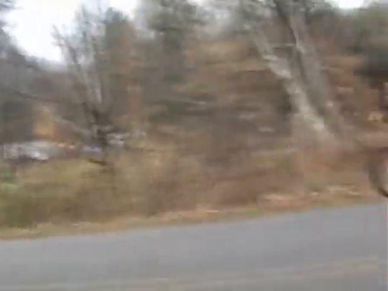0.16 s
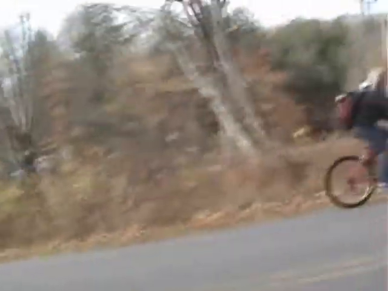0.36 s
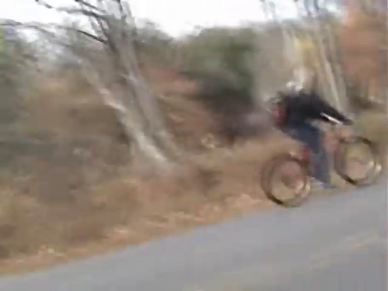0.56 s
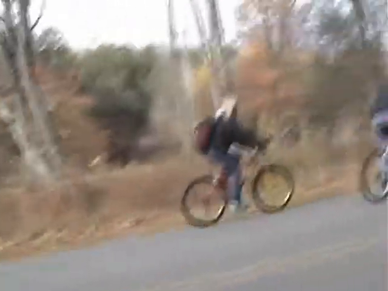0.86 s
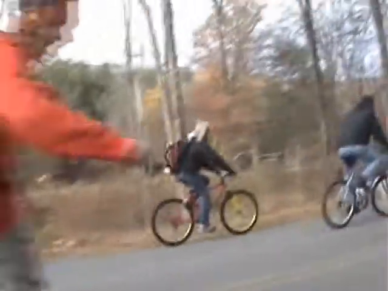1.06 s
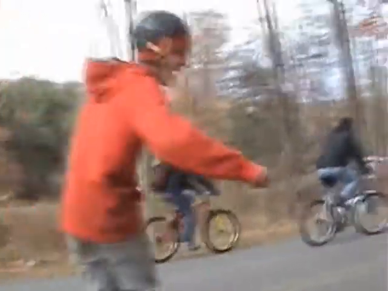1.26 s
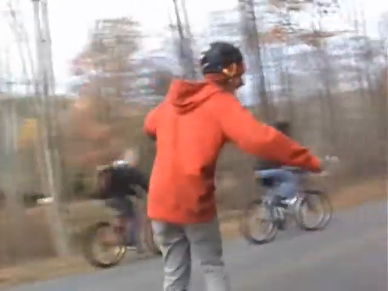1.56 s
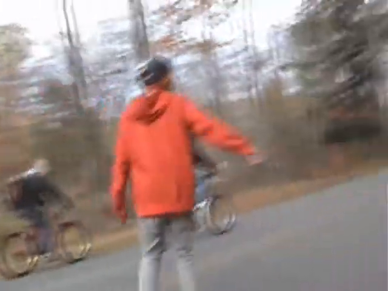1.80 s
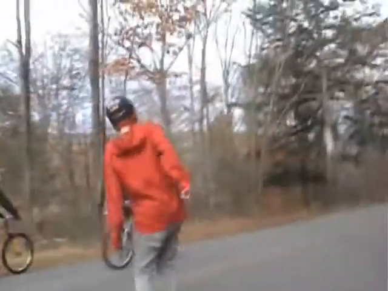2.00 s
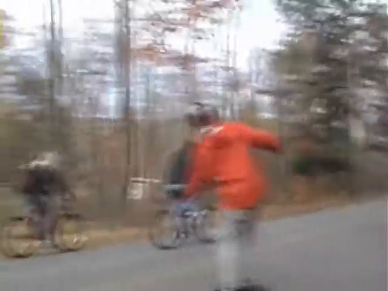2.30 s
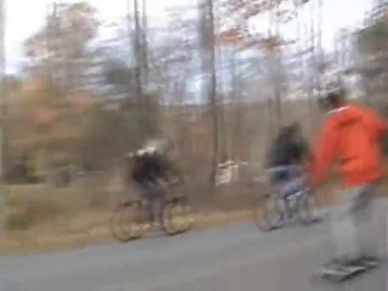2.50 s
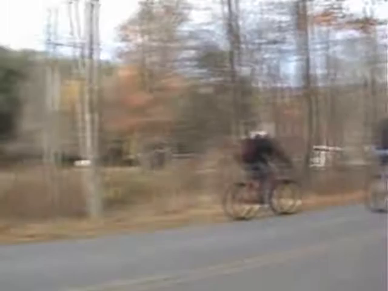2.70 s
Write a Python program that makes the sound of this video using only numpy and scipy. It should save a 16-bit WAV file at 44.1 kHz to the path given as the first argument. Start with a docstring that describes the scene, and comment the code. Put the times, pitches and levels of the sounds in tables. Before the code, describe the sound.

Hard skateboard wheels roar and whine on rough asphalt, passing close from left to middle, with a deck knock and gritty sprays; then a sharp clatter and a quieter low rumble and hum, outdoors, dull-topped microphone.

```python
"""Longboard rolling past

A longboard rolls fast past on a country road: random grit drives a broad roar, a wheel whine, deck resonances,
a treble hiss and a scrape, with short sprays on coarse patches. As the rider turns away the roar drops to
filtered-noise rumble, a faint whine and a soft sine hum. Struck deck modes make the knocks and short sagging
sines the pebble ticks, over low air noise."""
import sys
import numpy as np
from scipy import signal
from scipy.io import wavfile
from scipy.ndimage import uniform_filter1d

SR = 44100
rng = np.random.default_rng(int(sys.argv[2]) if len(sys.argv) > 2 else 0)


def wrap_up_sound(samples):
    """Save the sound to the file named by the first command line argument, as 16-bit audio."""
    columns = np.atleast_2d(samples).T
    # keep every value between -1 and 1, then stretch to whole-number steps
    tamed = np.clip(columns, -1, 1)
    steps = np.round(tamed * 32767).astype(np.int16)
    wavfile.write(sys.argv[1], SR, steps)


def voltage_ratio(level):
    """Linear amplitude factor for a level in decibels (scalar or array-like)."""
    return 10 ** (np.asarray(level, float) / 20)


N = 125685


def rms_one(x):
    """Scale to rms 1."""
    return x / np.sqrt(np.mean(x ** 2) + 1e-20)


def in_time(rows):
    """Columns of a curve table, one value per sample."""
    s, *columns = np.transpose(rows)
    return [np.interp(np.arange(N) / SR, s, column) for column in columns]


def at_hz(points, hz):
    """Read a spectrum on a log-frequency axis."""
    point_hz, value = np.transpose(points)
    return np.interp(np.log(hz), np.log(point_hz), value)


def drift(rate_hz):
    """Slow random curve of rms 1: noise through a double pole, drawn every 40 samples."""
    step = 40
    r = np.exp(-2 * np.pi * rate_hz * step / SR)
    noise = rng.standard_normal(N // step + 2002)
    slow = signal.lfilter([1], [1, -2 * r, r * r], noise)[2000:]
    return np.interp(np.arange(N) / step, np.arange(len(slow)), rms_one(slow))


def pan(left_minus_right_db):
    """Gains of both channels for a level difference."""
    half_db = np.asarray(left_minus_right_db) / 2
    return voltage_ratio(np.array([half_db, -half_db]))


def grit():
    """Four unrelated streams of stones met by the wheels, over fine texture."""
    stones_per_s, spread_db, texture = 4000, 3, 0.36
    size_db = spread_db * np.minimum(rng.exponential(1, (4, N)), 5)
    hit = rng.random((4, N)) < stones_per_s / SR
    return rms_one((voltage_ratio(size_db) * hit + texture) * rng.standard_normal((4, N)))


def coloured(source, spectrum, likeness, patchy_db, second=None, share=0):
    """Third-octave bank with flicker and stereo likeness per band, optional glide to a second spectrum."""
    out, together = 0, drift(13.4)
    first_hz, last_hz = spectrum[0][0], spectrum[-1][0]
    edges = first_hz * 2 ** np.arange(0, np.log2(last_hz / first_hz), 1 / 3)
    tops = list(edges[1:]) + [last_hz + 1]
    for k, (low, high) in enumerate(zip(edges, tops)):
        sos = signal.butter(2, [low, min(high, .45 * SR)], "band", fs=SR, output="sos")
        mid, side = signal.sosfilt(sos, source[k % 2::2])  # neighbouring bands use different streams
        hz = np.sqrt(low * high)
        alike = np.clip(at_hz(likeness, hz), -1, 1)
        level_db = at_hz(spectrum, hz) * (1 - share) + at_hz(second or spectrum, hz) * share
        flicker_db = patchy_db * (together + 1.9 * drift(42))
        stereo = np.sqrt(1 + alike) * mid + np.sqrt(1 - alike) * side * [[1], [-1]]
        out = out + voltage_ratio(level_db + flicker_db) * stereo
    # level the result over half a second
    running_power = uniform_filter1d(np.mean(out ** 2, axis=0), size=SR // 2)
    return out / np.sqrt(running_power + 1e-20)


def sing(source, hz, width_hz, side_db):
    """Noise through a resonance whose centre moves; the channels differ slightly."""
    sos = signal.butter(1, width_hz / 2, fs=SR, output="sos")
    carrier = np.exp(2j * np.pi * np.cumsum(hz * np.ones(N)) / SR)
    slow = signal.sosfilt(np.vstack([sos, sos]), source * carrier.conj())
    mid, side = [rms_one((v * carrier).real) for v in slow[:2]]
    return mid + voltage_ratio(side_db) * side * [[1], [-1]]


def ring(clicks, hz, t60_s):
    """Two-pole resonator: a unit click sets a sine of height 1 ringing."""
    r, w = voltage_ratio(-60 / (t60_s * SR)), 2 * np.pi * hz / SR
    return signal.lfilter([0, np.sin(w)], [1, -2 * r * np.cos(w), r * r], clicks + 1e-18)


# low air spectrum: [hz, relative_db_per_hz]
AIR_SPECTRUM = [(20, -19), (33, -20), (40, -8), (80, -12), (105, -9.5), (128, 5.5), (170, -13.5),
                (220, -25)]


def air():
    """A steady low rumble of moving air: coloured noise."""
    likeness = [(20, 0.9), (170, 1.0)]  # hz, left-right likeness
    rumble = coloured(rng.standard_normal((4, N)), AIR_SPECTRUM, likeness, patchy_db=0.3)
    return voltage_ratio(-43.5) * rumble * pan(-1.9)[:, None]


# rumble of wheels and road, low part before a fixed gain: [time_s, low_db, high_db]
RUMBLE = [(0.0, -36, -26), (0.78, -33.5, -40), (0.84, -30.5, -37), (1.44, -34.5, -36.5),
          (1.81, -33.5, -34.5), (2.12, -35.5, -39.5), (2.15, -40.5, -40.5), (2.85, -40.5, -40.5)]
# low rumble spectrum: [hz, relative_db_per_hz]
RUMBLE_LOW = [(53, -43), (90, -24), (125, -5), (183, 0.5), (217, 8), (241, 0), (270, 0), (507, 4),
              (1100, -6), (1430, -19), (2420, -40)]
# high rumble spectrum: [hz, relative_db_per_hz]
RUMBLE_HIGH = [(530, -36), (900, -26), (1210, -5), (1310, -2.5), (2110, -6.5), (2470, -7.5), (3090, -10),
               (3710, -12), (6540, -16.5), (13500, -31)]
# distant rumble stereo: [hz, left_right_likeness]
FAR_LIKENESS = [(60, 1), (180, 0.97), (550, 0.8), (1650, 0.54), (4970, 0.54), (15000, 1)]
# distant wheel whine: [time_s, pitch_hz, level_db]
FAR_WHINE = [(1.45, 1980, -70), (1.55, 1980, -43.5), (1.66, 1950, -39), (1.72, 1930, -48),
             (1.76, 1940, -44), (1.8, 2080, -52), (1.835, 2260, -41), (1.87, 2130, -33.5), (1.9, 2180, -55),
             (2.25, 2140, -43), (2.35, 1990, -56), (2.7, 2030, -51), (2.79, 1930, -39.5), (2.85, 1960, -40)]
# distant deck resonance, before a fixed gain: [time_s, pitch_hz, level_db]
FAR_DECK = [(1.5, 495, -28.5), (1.73, 595, -46), (1.76, 687, -23), (1.8, 640, -24.5), (1.845, 438, -27),
            (1.89, 450, -52), (2.044, 435, -22.5), (2.284, 390, -56), (2.44, 616, -42), (2.5, 690, -40),
            (2.85, 744, -37.5)]


def far_roll():
    """Low noise rumble, dulled high grit noise, faint whine and deck resonance, and a wavering sine hum."""
    low_db, high_db = in_time(RUMBLE)
    whine_hz, whine_db = in_time(FAR_WHINE)
    deck_hz, deck_db = in_time([(1.45, 600, -77)] + list(FAR_DECK))
    white = rng.standard_normal((4, N))
    low = voltage_ratio(low_db + 3.5) * coloured(white, RUMBLE_LOW, FAR_LIKENESS, patchy_db=0.24)
    dull = signal.cheby2(12, 40, 13500, fs=SR, output="sos")
    high = voltage_ratio(high_db) * signal.sosfilt(dull, coloured(grit(), RUMBLE_HIGH, FAR_LIKENESS, patchy_db=1.0))
    whine = voltage_ratio(whine_db + 1.9 * drift(24)) * sing(white[::-1], whine_hz, width_hz=210, side_db=-10)
    deck = voltage_ratio(deck_db - 8.5) * sing(white[::-1], deck_hz, width_hz=107, side_db=-12)
    hum_hz, waver_hz, hum_db, hum_from_s, rise_s = 249.4, 1.83, -39.5, 2.03, 0.21
    rise = np.clip((np.arange(N) / SR - hum_from_s) / rise_s, 0, 1)
    phase = 2 * np.pi * np.cumsum(hum_hz + waver_hz * drift(6.5)) / SR
    hum = voltage_ratio(hum_db + 1.6 * drift(12.0)) * rise * np.sin(phase)
    return pan(0.84)[:, None] * (low + high + whine + deck + hum)


# pebble ticks: [start_s, level_db, ring_hz, left_minus_right_db]
TICKS = [(1.7526, -20, 4800, -.5), (1.7565, -20.5, 6350, -3), (2.1218, -16.5, 3030, 6.5),
         (2.1222, -25, 5700, 4), (2.585, -33.5, 4800, 14), (2.815, -33, 6200, -17)]


def ticks():
    """Pebbles ring a few sagging cycles over a broad crack, then a lower ring; small ones come at random."""
    sag_per_s, cycles_to_60db, crack_db, crack_s = 150, 8.8, -8, 0.0028
    low_share, low_db, low_at_s, low_length_s = 0.468, -7, 0.0018, 0.00062
    small_per_s, small_db = 13, -56
    out, age_s = np.zeros((2, N + SR)), np.arange(600) / SR
    draw = rng.random((int(small_per_s * N / SR), 4))
    small = [(a * N / SR, small_db + 9 * b, 3000 + 4500 * c, 6 * d - 1) for a, b, c, d in draw]
    for start_s, level_db, hz, side_db in list(TICKS) + small:
        crack = voltage_ratio(crack_db - 20 * (age_s / crack_s) ** 2) * np.diff(rng.standard_normal(601))
        cycles = np.cumsum(hz * np.exp(-sag_per_s * age_s)) / SR
        body = np.sin(2 * np.pi * cycles) * voltage_ratio(-60 * (cycles / cycles_to_60db) ** 2.5)
        body = body * (1 - np.exp(-cycles / 0.15))  # soft onset
        low_swell = np.exp(-((age_s - low_at_s) / low_length_s) ** 2)
        low_ring = voltage_ratio(low_db) * np.sin(2 * np.pi * low_share * hz * age_s) * low_swell
        i = int(start_s * SR)
        out[:, i:i + 600] += voltage_ratio(level_db) * pan(side_db)[:, None] * (body + low_ring + crack)
    dull = signal.butter(4, 9100, fs=SR, output="sos")
    return signal.sosfilt(dull, out[:, :N] + 1e-18)


# deck knocks: [start_s, strike_db]
KNOCKS = [(0.515, -10.5), (1.7526, -8.5), (1.779, -19), (1.7915, -11.5), (1.806, -19), (1.835, -30),
          (2.5, -22.5), (2.65, -20.5), (2.82, -18.5)]
# deck modes, added to each strike: [pitch_hz, relative_db, t60_s]
DECK_MODES = [(235, -12.5, 0.025), (410, -16.5, 0.07), (640, -7.5, 0.038), (796, -9.5, 0.023),
              (1294, -14, 0.028), (1872, -16.5, 0.054), (2640, -20, 0.036)]


def knocks():
    """Each knock strikes every deck mode with a random strength of its own."""
    start_s, strike_db = np.transpose(KNOCKS)
    luck_db = rng.normal(0, 2.6, (len(start_s), len(DECK_MODES)))
    out = np.zeros(N)
    for k, (hz, mode_db, t60_s) in enumerate(DECK_MODES):
        clicks = np.zeros(N)
        clicks[(start_s * SR).astype(int)] = voltage_ratio(strike_db + mode_db + luck_db[:, k]) * (-1) ** k
        out += ring(clicks, hz, t60_s)
    return out * pan(1.6)[:, None]


# coarse patches crossed: [centre_s, level_db, length_s]
SPRAYS = [(0.088, -28, 0.02), (0.408, -24, 0.0054), (0.722, -29.5, 0.005), (0.833, -29, 0.0086),
          (1.004, -29.5, 0.008), (1.241, -32, 0.006), (1.761, -38, 0.0051)]
# spray spectrum: [hz, relative_db_per_hz]
SPRAY_SPECTRUM = [(1500, -16), (3000, 2), (4000, 5), (5200, -7.5), (7000, -9.5), (10000, -23), (15000, -13)]
# near stereo, shared with near_roll: [hz, left_right_likeness]
LIKENESS = [(60, 0.79), (180, 0.94), (550, 0.5), (1650, 0.94), (4970, 0.9), (15000, 0.86)]


def sprays():
    """Each coarse patch is a short swell of coloured grit with a weaker decaying tail."""
    tail_db, tail_s = -11, 0.03
    t, envelope = np.arange(N) / SR, np.zeros(N)
    for centre_s, level_db, length_s in SPRAYS:
        swell = np.exp(-((t - centre_s) / length_s) ** 2)
        tail = voltage_ratio(tail_db) * (t > centre_s) * np.exp(-abs(t - centre_s) / tail_s)
        envelope += voltage_ratio(level_db) * (swell + tail)
    return envelope * coloured(grit(), SPRAY_SPECTRUM, LIKENESS, patchy_db=0.6)


def scrape(stones):
    """A bright grit-driven resonance that swells quickly and lingers."""
    peak_s, rise_s, die_s = 0.395, 0.03, 0.21
    t = np.arange(N) / SR
    envelope = np.exp(-abs(t - peak_s) / np.where(t > peak_s, die_s, rise_s))
    return voltage_ratio(-29.5) * envelope * sing(stones, 3810, width_hz=410, side_db=-7.5)


# roar by nearness: [time_s, level_db]
ROAR = [(0, -19.5), (.3, -22.5), (.59, -19.5), (.628, -24), (.64, -19.5), (.7, -24.5), (.85, -22.5),
        (.95, -21), (1.1, -24), (1.42, -24.5), (1.5, -30.5), (1.58, -55)]
# start and end of the swing from facing to passing: [time_s]
TURN_S = (0.32, 1.18)
# roar as it comes: [hz, relative_db_per_hz]
FACING = [(1000, 6), (1200, -24.5), (1500, 1), (2000, 2.5), (2800, -9.5), (3300, -16), (4200, -18.5),
          (6000, -43), (11000, -48), (13200, -26.5), (14400, -25)]
# roar as it passes: [hz, relative_db_per_hz]
PASSING = [(590, -46), (1000, -29), (1280, -1.5), (1620, 0.5), (2040, -0.5), (2550, -6), (3050, -7.5),
           (5220, -21), (9850, -24), (14400, -30)]
# wheel whine: [time_s, pitch_hz, level_db]
WHINE = [(0, 1855, -23), (.08, 1830, -21), (.15, 1670, -29), (.18, 1704, -15.5), (.26, 1693, -22.5),
         (.34, 1660, -17.5), (.375, 1625, -35), (.41, 1640, -19.5), (.58, 1580, -22), (.628, 1550, -28),
         (.64, 1510, -17), (.72, 1450, -23), (.9, 1536, -24), (.98, 1564, -22.5), (1.04, 1800, -30),
         (1.15, 1600, -30), (1.2, 1626, -18), (1.28, 1580, -29), (1.44, 1410, -31.5), (1.55, 1360, -45)]
# deck resonance: [time_s, pitch_hz, level_db]
DECK = [(0, 780, -35), (.09, 846, -29.5), (.2, 840, -32.5), (.4, 654, -39.5), (.62, 715, -35),
        (.68, 745, -27), (.85, 696, -27.5), (.95, 577, -28.5), (1.1, 563, -30.5), (1.25, 530, -27),
        (1.38, 640, -28), (1.46, 640, -27.5), (1.55, 563, -39)]
# upper wheel resonance: [time_s, pitch_hz, level_db]
UPPER = [(0, 2470, -23.5), (.3, 2490, -25.5), (.5, 2930, -31), (.62, 2600, -45), (.88, 3200, -47),
         (.95, 3170, -26), (1.05, 2630, -30), (1.28, 2450, -25), (1.43, 2300, -30.5), (1.53, 2300, -60)]
# lower wheel resonance: [time_s, pitch_hz, level_db]
LOWER = [(0, 870, -33.5), (.42, 930, -33.5), (.5, 930, -27), (.65, 950, -34), (.9, 1340, -30.5),
         (1.1, 1220, -27.5), (1.42, 1030, -28.5), (1.53, 1070, -35)]
# treble hiss: [time_s, level_db]
HISS_LEVEL = [(0, -49), (.1, -41.5), (.25, -62), (.8, -47.5), (1.0, -56), (1.2, -45), (1.45, -42.5),
              (1.55, -42)]
# treble hiss spectrum: [hz, relative_db_per_hz]
HISS_SPECTRUM = [(6000, -5), (8000, -6), (9000, 1), (10500, -2.5), (11800, -10), (13000, -15), (15000, -20)]
# move from left to middle: [time_s, left_minus_right_db]
PASS_BY = [(0, 6.5), (.6, 5), (1.05, 2.5), (1.45, 0.5)]


def near_roll():
    """Grit drives a broad roar, a lumpy whine, the deck, two weaker resonances, a hiss, a scrape and sprays."""
    roar_db, hiss_db, side_db = in_time(ROAR)[0], in_time(HISS_LEVEL)[0], in_time(PASS_BY)[0]
    whine_hz, whine_db = in_time(WHINE)
    deck_hz, deck_db = in_time(DECK)
    upper_hz, upper_db = in_time(UPPER)
    lower_hz, lower_db = in_time(LOWER)
    t, stones = np.arange(N) / SR, grit()
    turn = np.interp(t, TURN_S, [0, 1])
    roll = voltage_ratio(roar_db) * coloured(stones, FACING, LIKENESS, 0.44, PASSING, turn)
    wobbling_hz = whine_hz + 11 * drift(29)
    lumpy_db = whine_db + 1.5 * drift(58)
    roll += voltage_ratio(lumpy_db) * sing(stones[::-1], wobbling_hz, width_hz=138, side_db=-31)
    roll += voltage_ratio(deck_db + 0.51 * drift(1.5)) * sing(stones[1:], deck_hz, width_hz=149, side_db=-31)
    roll += voltage_ratio(upper_db) * sing(stones[2:], upper_hz, width_hz=540, side_db=-15.5)
    roll += voltage_ratio(lower_db) * sing(stones[2:], lower_hz, width_hz=270, side_db=-16)
    roll += voltage_ratio(hiss_db) * coloured(stones[::-1], HISS_SPECTRUM, LIKENESS, patchy_db=0.81)
    roll += scrape(stones)
    fade_from_s, fade_db_per_s = 1.475, 200
    fade = voltage_ratio(-fade_db_per_s * np.maximum(t - fade_from_s, 0))
    return pan(side_db) * (fade * roll + sprays())


def scene():
    """Everything on the open road."""
    return air() + far_roll() + ticks() + knocks() + near_roll()


def top_cut(x):
    """Nothing passes above the cut-off."""
    return signal.sosfilt(signal.butter(12, 15710, fs=SR, output="sos"), x)


def record(dry):
    """A steep low-pass cuts the top of the mix."""
    low_pass = signal.cheby2(22, 70, 14900, fs=SR, output="sos")
    mix = signal.sosfilt(low_pass, dry)
    return top_cut(mix)


dry = scene()
out = record(dry)
wrap_up_sound(out)
```